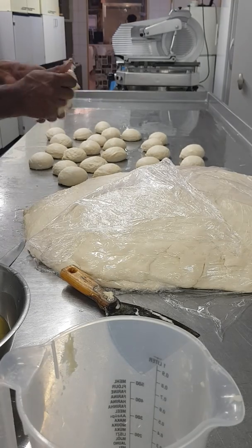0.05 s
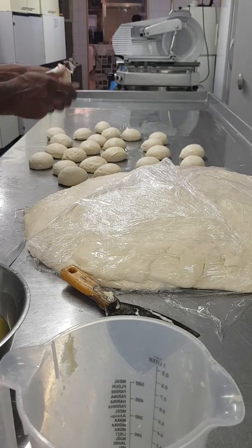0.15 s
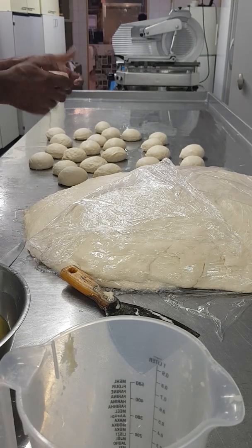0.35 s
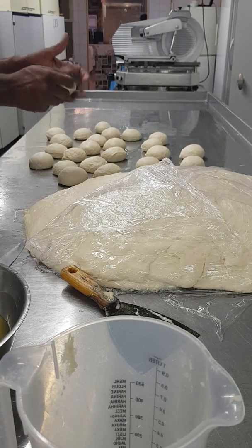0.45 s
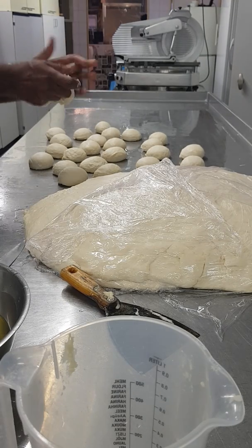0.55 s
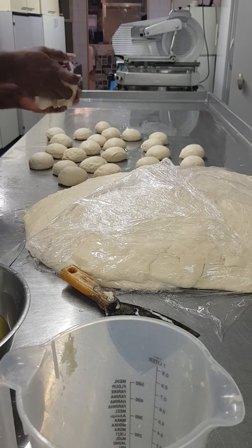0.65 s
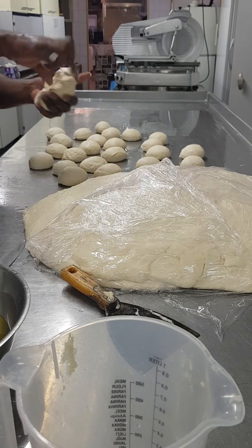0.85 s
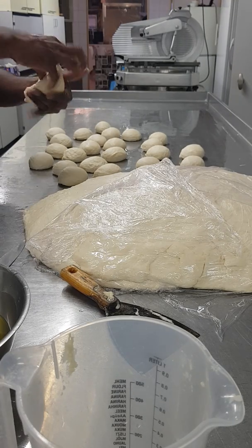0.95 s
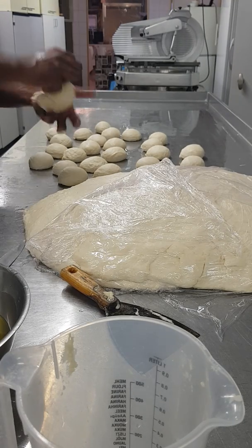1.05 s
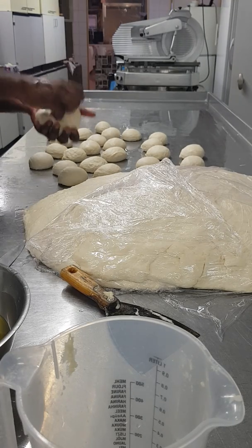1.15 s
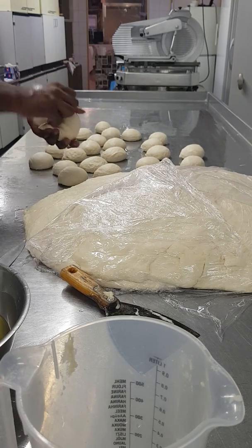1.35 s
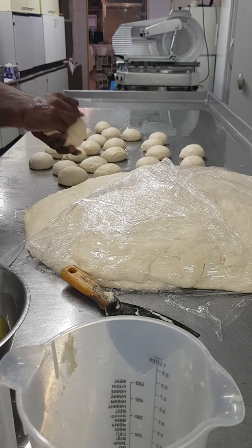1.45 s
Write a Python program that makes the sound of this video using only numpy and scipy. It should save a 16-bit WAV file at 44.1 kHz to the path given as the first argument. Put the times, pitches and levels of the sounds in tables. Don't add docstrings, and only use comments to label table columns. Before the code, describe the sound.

A dough ball is slapped onto a steel worktable with a loud, low boom and a short hard-room ring; then a faint pat, soft floury rubbing and tiny distant clinks over low machine hum, close phone microphone.

```python
import sys
import numpy as np
from scipy import signal
from scipy.fft import rfft, irfft
from scipy.io import wavfile
from scipy.ndimage import uniform_filter1d, minimum_filter1d

SR = 44100
rng = np.random.default_rng(int(sys.argv[2]) if len(sys.argv) > 2 else 0)


def unload_audio(sound):
    columns = np.transpose(np.atleast_2d(sound))
    steps = np.round(np.clip(columns, -1, 1) * 32767)
    wavfile.write(sys.argv[1], SR, steps.astype(np.int16))


def invert_db(x):
    u = np.asarray(x, float) / 20
    return 10 ** u


N = 66150
T = np.arange(N) / SR
F = np.arange(N // 2 + 1) * SR / N + 1e-3
SLAP_S, PAT_S = .2215, .658

# (frequency [Hz], level [dB], time to fall 60 dB [s], build-up [cycles])
SHEET_MODES = [(71.2, -20, 0.45, 2.4), (116.9, -6.5, 0.4, 5.2), (159.7, -11.5, 0.37, 4.4),
               (175.3, -5, 0.2, 1.4), (221.6, -5, 0.19, 0.97), (252.1, -1, 0.25, 4.2),
               (277.2, -15.5, 0.42, 2.5), (371.9, -22.5, 0.34, 2), (428.5, -23, 0.4, 3.7),
               (465.3, -24.5, 0.13, 6.1), (629.4, -24, 0.36, 11)]
# (frequency [Hz], difference [dB])
SHEET_PAN = [(68, 4), (117, -0.1), (250, -3.5), (400, 4.5)]
# (frequency [Hz], level per Hz [dB])
SMACK_COLOUR = [(60, -24), (250, -7), (330, -18), (1200, -21.5), (4000, -31), (6300, -42), (11000, -39.5),
                (15500, -53)]
# (frequency [Hz], time to fall 60 dB [s])
ROOM_RING = [(100, 0.42), (300, 0.38), (700, 0.34), (1840, 0.38), (4850, 0.34), (10000, 0.27),
             (15000, 0.22)]
# (frequency [Hz], level per Hz [dB])
PAT_COLOUR = [(300, -30), (880, 1.5), (1500, -9), (2600, 1.5), (4000, 2.5), (5500, -12.5), (11500, -14.5),
              (15500, -30)]
# (frequency [Hz], level per Hz [dB])
RUB_COLOUR = [(1000, -14), (3000, 3), (6000, -2.5), (10500, -0.5), (13000, -8.5), (15500, -14)]
# (middle [s], half length [s], level [dB])
STROKES = [
    (1.169, .11, -61),
    (1.49, 0.051, -71.5),
]
# (time [s], frequency [Hz], level [dB], time to fall 60 dB [s])
CLINKS = [
    (.943, 1410, -62, .22),
    (.943, 1200, -63, .22),
    (1.122, 1780, -63, .1),
    (1.37, 640, -60, .05),
    (.845, 4650, -76, .15),
    (.672, 11600, -72, .15),
    (.657, 900, -59, .08),
]
# (frequency [Hz], level [dB], wobble [dB])
HUM_LINES = [(99.2, -50.5, .6), (200, -48.5, 1.2), (1727, -83, 1.2), (1776, -82, 1.2)]
# (frequency [Hz], level per Hz [dB])
AIR_COLOUR = [(30, -27), (70, -11.5), (290, -2.5), (330, -14), (1000, -25.5), (1400, -31.5), (6500, -45),
              (15500, -51)]
# (frequency [Hz], width [Hz], level [dB])
CASINGS = [(248, 63, -53.5), (634, 67, -65.5), (1850, 320, -75), (2640, 350, -74), (3410, 120, -75),
           (3980, 200, -73.5), (5000, 230, -80)]
# (frequency [Hz], difference [dB])
PORTS = [(250, 0.1), (500, 4.5), (1000, 3.3), (2000, -2.4), (4500, 2.8), (8000, 9), (12000, 4.5)]


def at(table, hz):
    table = np.array(table, float)
    return np.interp(np.log(hz), np.log(table[:, 0]), table[:, 1])


def pan(db):
    return invert_db(np.array([[db], [-db]]) / 2)


def noise(gain):
    mid, side = rfft(rng.standard_normal((2, N)))
    alike = 1 / (1 + (F / 602) ** 2)
    mid = mid * np.sqrt(1 + alike)
    side = side * np.sqrt(1 - alike)
    x = np.array([mid + side, mid - side]) * gain
    return x / np.std(irfft(x, N))


def wash(colour, db, shape):
    spectrum = noise(invert_db(at(colour, F)))
    out = 0
    for step in range(12, 43):
        band = np.clip(1 - abs(3 * np.log2(F) - step), 0, 1)
        centre_hz = 2 ** (step / 3)
        out = out + irfft(spectrum * band, N) * shape(centre_hz)
    return out * invert_db(db)


def walk(rate):
    k = int(SR / rate)
    steps = np.repeat(rng.standard_normal(N // k + 1), k)
    drift = uniform_filter1d(uniform_filter1d(steps, k), k)[:N]
    return (drift - drift.mean()) / drift.std()


def strike(start, rise, t60, hold=0.):
    t = np.clip(T - start, 0, None)
    build = 1 - np.exp(-(t / rise) ** 2)
    return build * invert_db(-60 * np.clip(t - hold, 0, None) / t60)


def sheet():
    ring = 0
    for k, (hz, db, t60, cycles) in enumerate(SHEET_MODES):
        sign = (-1) ** k
        level = invert_db(db + 1.6 * walk(18.74))
        envelope = strike(SLAP_S, cycles / hz, t60, hold=0.029)
        tone = np.sin(2 * np.pi * hz * (T - SLAP_S))
        ring = ring + sign * level * envelope * pan(at(SHEET_PAN, hz)) * tone
    return ring * invert_db(-4)


def smack():
    def shape(hz):
        rise_s = 0.002 * (1 + hz / 9000) + 1 / hz
        early = strike(SLAP_S, rise_s, at(ROOM_RING, hz), hold=0.014)
        late = strike(SLAP_S, 0.0078, 2.08 * at(ROOM_RING, hz))
        return early + invert_db(-21.5) * late

    return wash(SMACK_COLOUR, -10, shape)


def pat():
    tail = strike(PAT_S, 0.0018, 0.44)
    tick = invert_db(1.5) * strike(PAT_S, 0.00049, 0.049)
    return irfft(noise(invert_db(at(PAT_COLOUR, F))), N) * (tail + tick) * invert_db(-51) * pan(.3)


def rub():
    speed = 0
    for mid, half, db in STROKES:
        speed = speed + invert_db(db) * np.exp(-abs((T - mid) / half) ** 2.8)
    hiss = irfft(noise(invert_db(at(RUB_COLOUR, F))), N)
    return hiss * speed * invert_db(0.86 * walk(39.8)) * pan(0.75)


def clinks():
    out = 0
    for start, hz, db, t60 in CLINKS:
        envelope = invert_db(db + 1.5 * walk(40)) * strike(start, .006, t60, hold=.025)
        side_shift = np.array([[.5], [-.5]])
        out = out + envelope * np.sin(2 * np.pi * hz * T + side_shift + 0.99 * walk(70.5))
    return out


def hum():
    beat_hz, beat_top_s, beat_depth = 4.35, .68, .6
    beat = 1 + beat_depth * np.cos(2 * np.pi * beat_hz * (T - beat_top_s))
    out = 0
    for hz, db, wobble in HUM_LINES:
        level = np.sqrt(2) * invert_db(db + wobble * walk(5.92))
        if hz == HUM_LINES[0][0]:
            level = level * beat
        side_shift = np.array([[0], [hz / 900]])
        out = out + level * np.sin(2 * np.pi * (hz * T + rng.random((1, 1))) + side_shift)
    return out * pan(.3)


def air():
    return wash(AIR_COLOUR, -49.5, lambda hz: invert_db(2.9 * walk(9.14)))


def casings():
    out = 0
    for hz, width, db in CASINGS:
        resonance = 1 / (1 + (2 * (F - hz) / width) ** 2)
        out = out + invert_db(db + 1.9 * walk(14.03)) * irfft(noise(resonance), N)
    return out


def microphone_hiss():
    return invert_db(-101) * rng.standard_normal((2, N))


def scene():
    hand_work = sheet() + smack() + pat() + rub()
    machines = hum() + air() + casings()
    return hand_work + clinks() + machines + microphone_hiss()


def band_limit(x):
    return signal.sosfilt(signal.butter(12, 15650, fs=SR, output="sos"), x)


def record(dry):
    dry = irfft(rfft(dry) * invert_db(np.outer([.5, -.5], at(PORTS, F))), N)
    limit, release_s = 0.91, 0.073
    peak = abs(dry).max(axis=0) + 1e-9
    need = np.log(np.clip(limit / peak, None, 1))
    held = uniform_filter1d(minimum_filter1d(need, size=301), size=151)
    keep = np.exp(-1 / (release_s * SR))
    slow = signal.lfilter([1 - keep], [1, -keep], held)
    wet = dry * np.exp(np.minimum(held, slow))
    top_cut = signal.ellip(8, .2, 70, 15650, fs=SR, output="sos")
    wet = signal.sosfilt(top_cut, wet)
    return band_limit(wet)


dry = scene()
out = record(dry)
unload_audio(out)
```